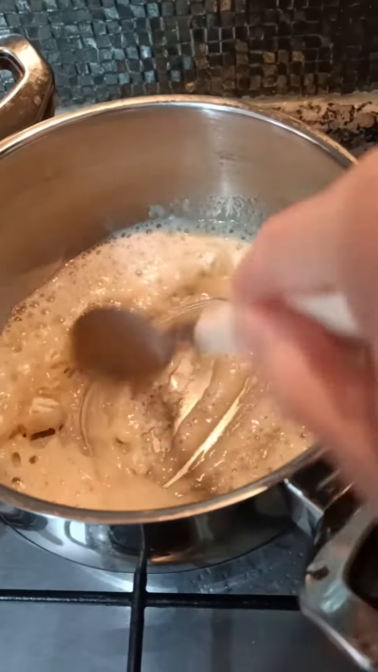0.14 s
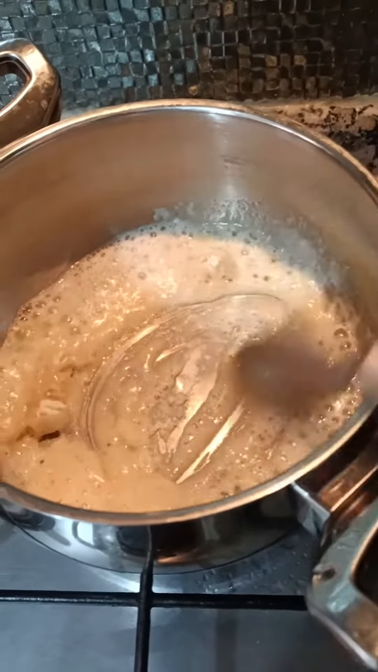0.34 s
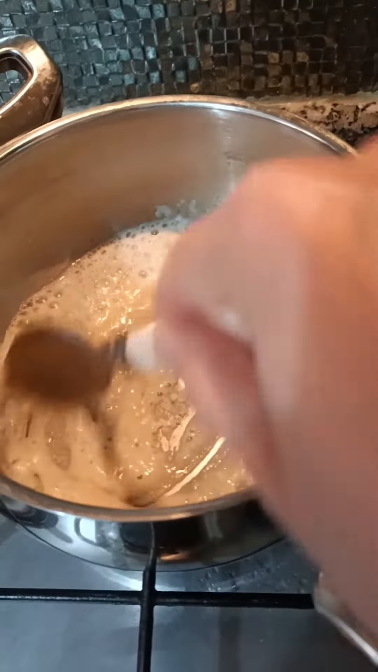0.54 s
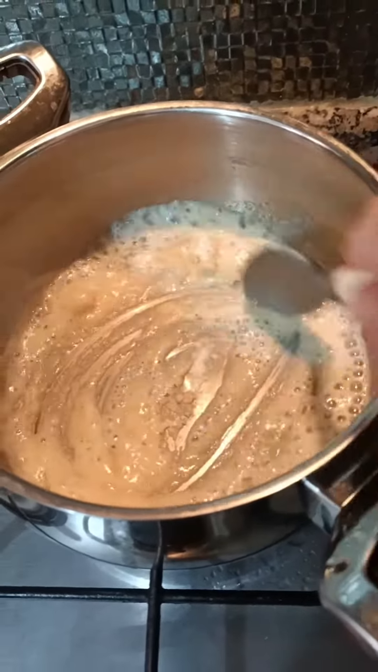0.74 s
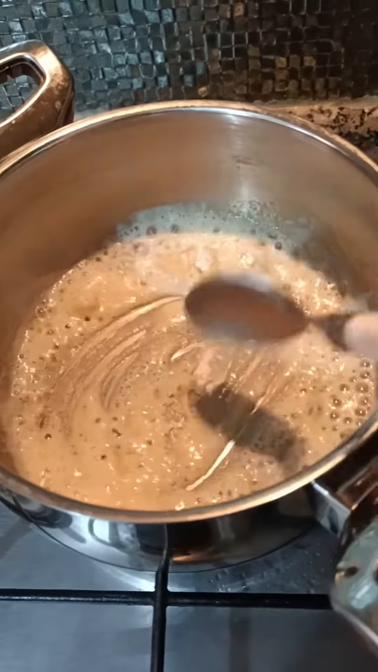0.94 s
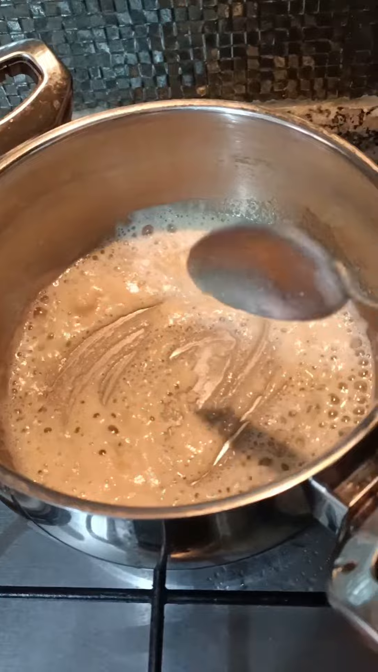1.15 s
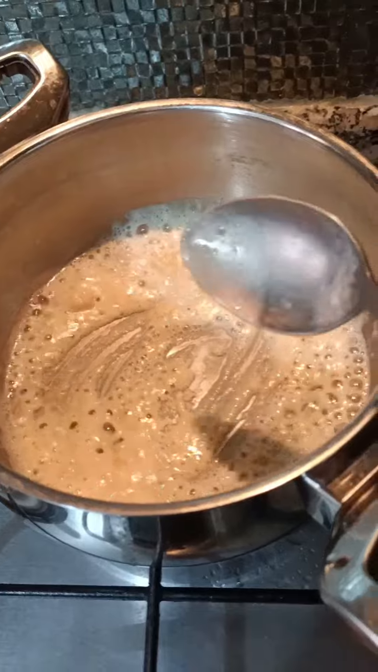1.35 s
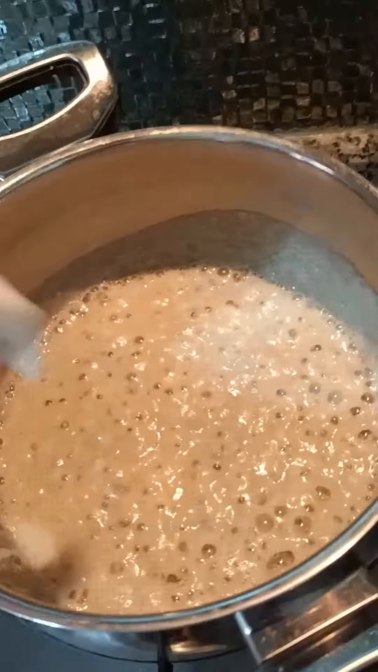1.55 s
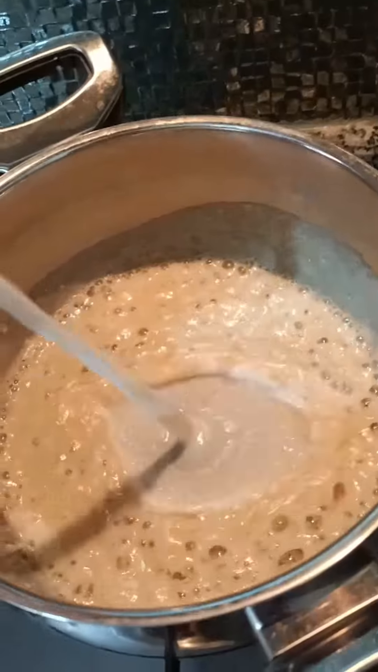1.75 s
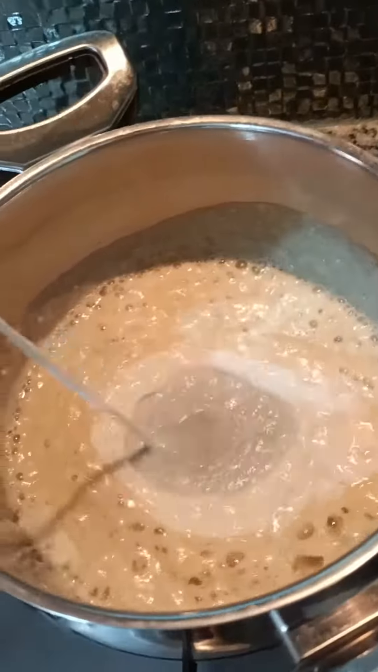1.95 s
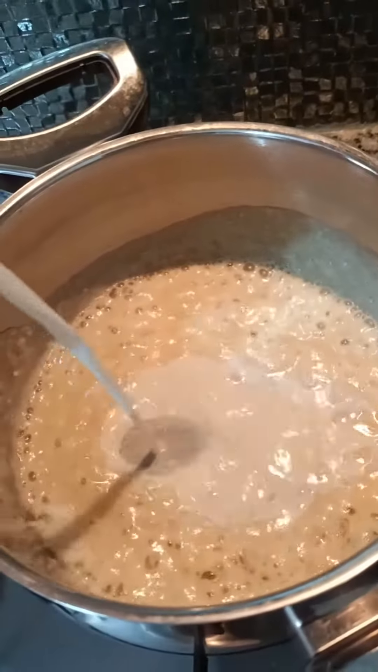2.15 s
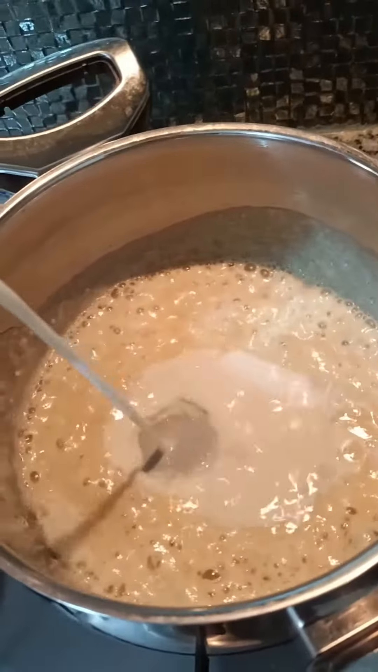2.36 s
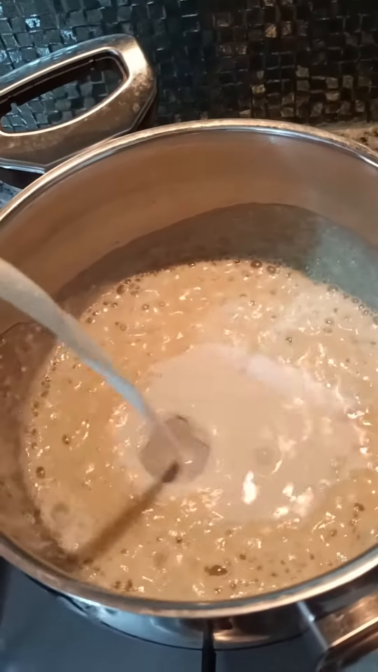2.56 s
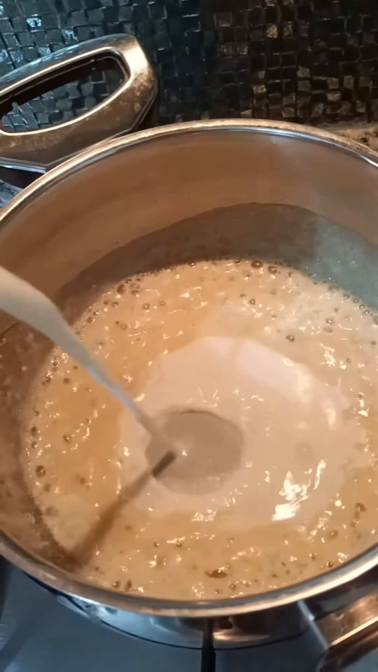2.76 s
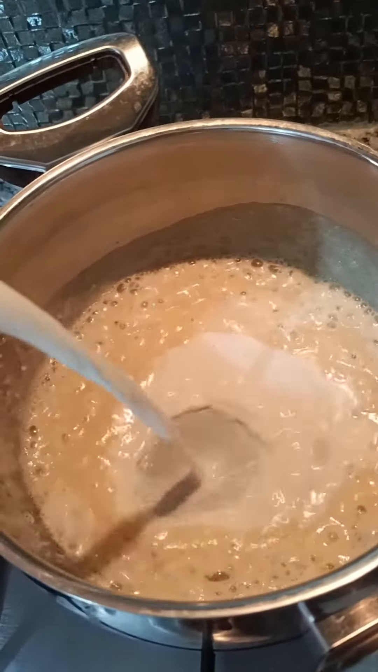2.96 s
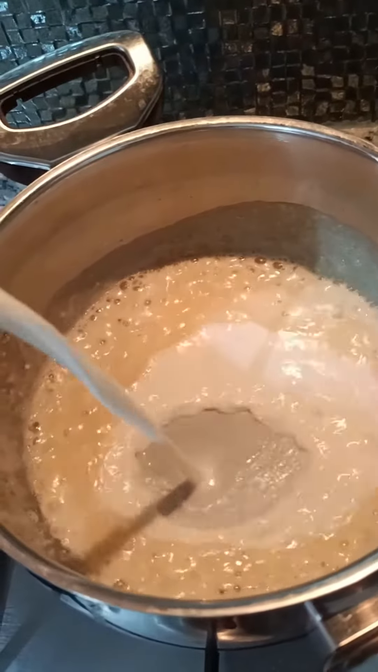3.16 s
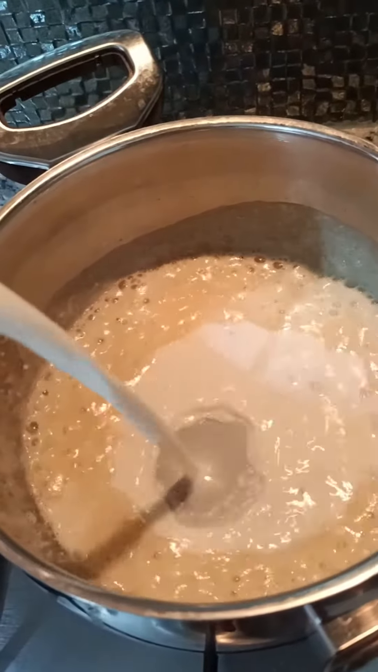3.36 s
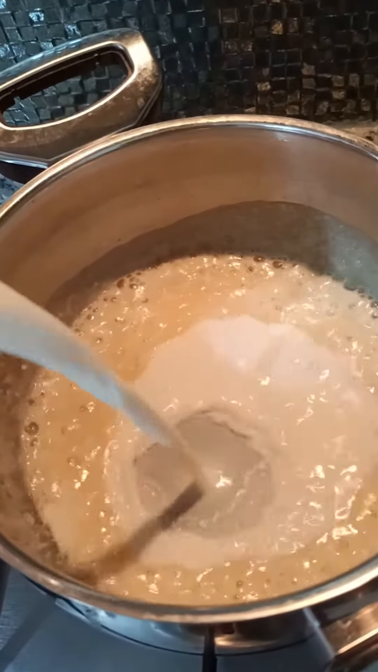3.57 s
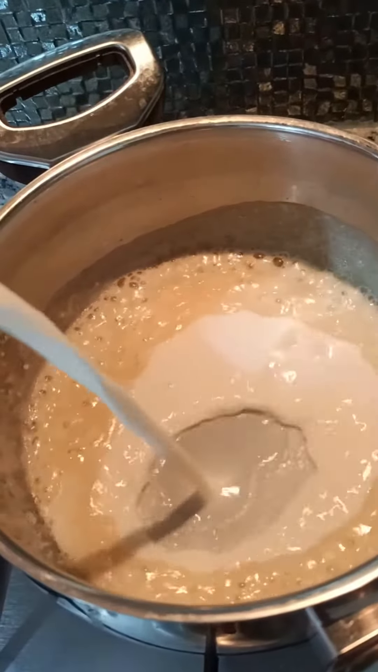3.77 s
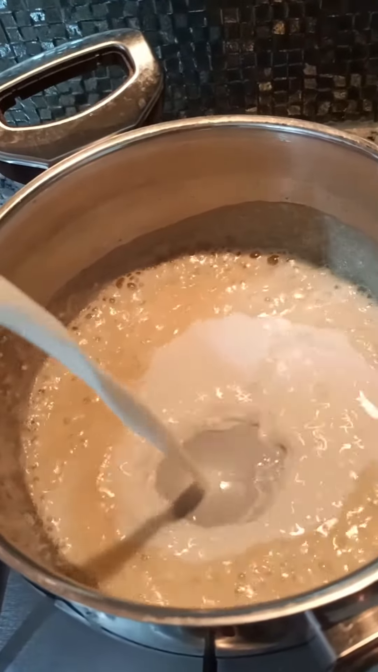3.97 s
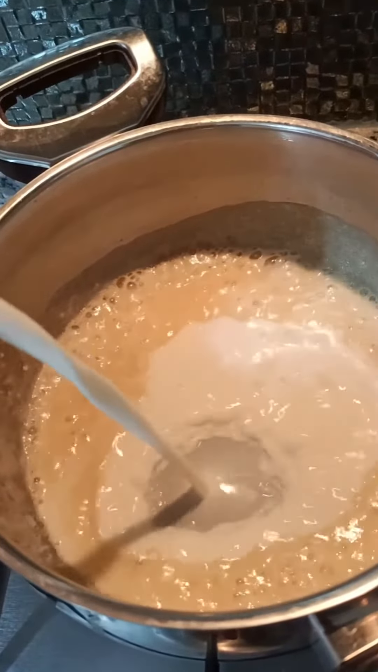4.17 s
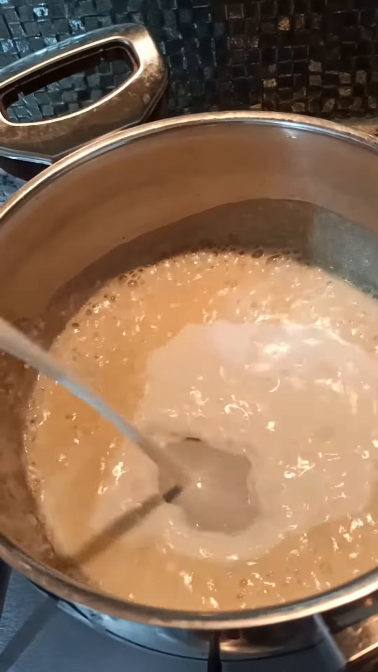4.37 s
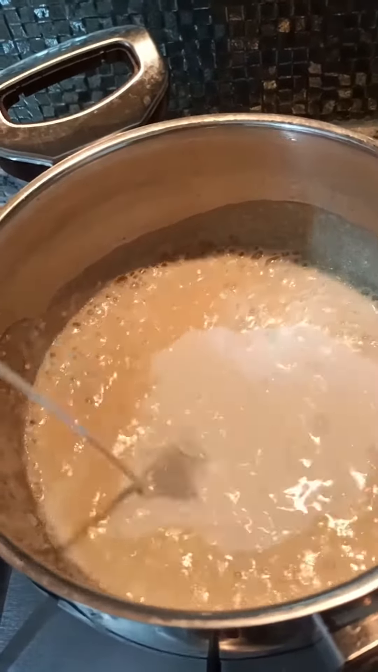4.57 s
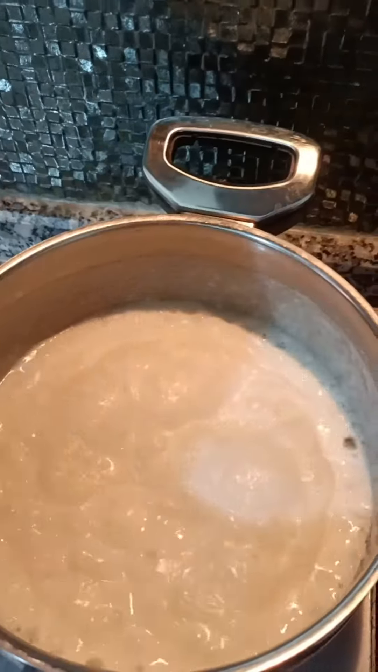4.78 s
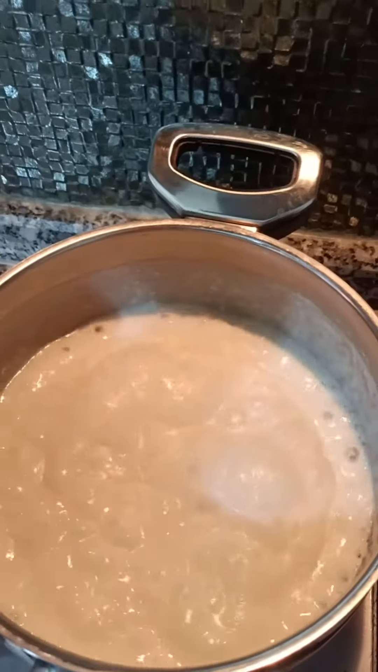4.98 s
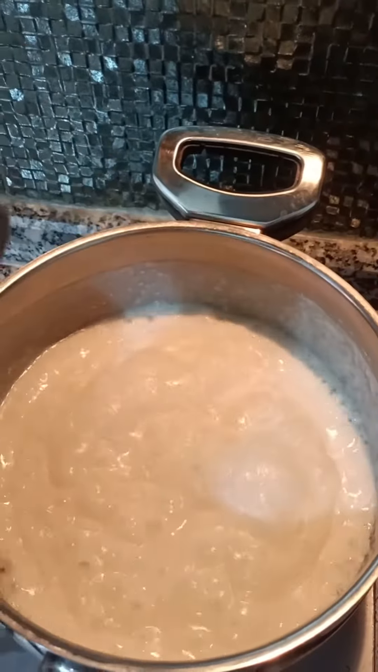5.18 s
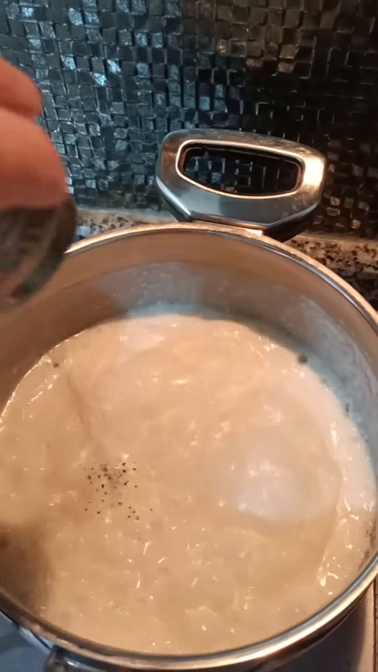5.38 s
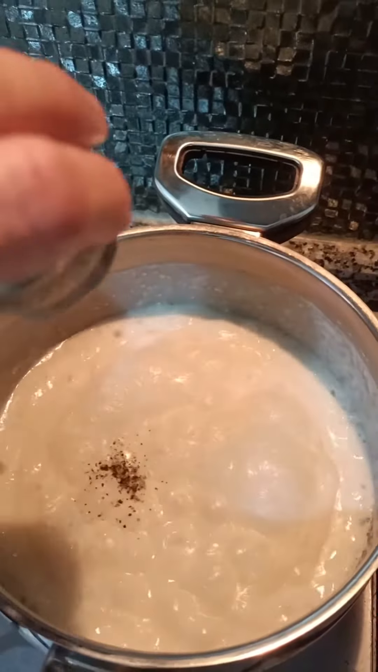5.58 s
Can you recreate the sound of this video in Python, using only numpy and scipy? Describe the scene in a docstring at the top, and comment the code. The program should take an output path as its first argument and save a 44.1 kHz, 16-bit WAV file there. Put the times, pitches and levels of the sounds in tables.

```python
"""Three shots of a steel pot on a gas hob, close to a phone, with the hob rumbling throughout.
First a spoon scrapes and strikes the pot, ringing its steel modes, while flour fries in dense tiny bursts.
Then cold milk is poured in: noise flashes up as hissing steam over a gurgle in the pot's air.
Last, spice is shaken in short dry rustles over the simmering sauce.
Each shot is cut off short and the next fades in; the pot rocks on its grate now and then."""
import sys
import numpy as np
from scipy import signal
from scipy.fft import rfft, irfft, next_fast_len
from scipy.io import wavfile
from scipy.ndimage import uniform_filter1d, map_coordinates

SR = 44100
rng = np.random.default_rng(int(sys.argv[2]) if len(sys.argv) > 2 else 0)


def wav_record(signal):
    """Record a signal, one row per channel, as 16-bit PCM in the file named by sys.argv[1]."""
    frames = np.transpose(np.atleast_2d(signal))
    bounded = np.clip(frames, -1, 1)
    # unit amplitude maps onto the largest positive 16-bit level
    quanta = np.round(bounded * 32767).astype(np.int16)
    wavfile.write(sys.argv[1], SR, quanta)


N = 248724

# milk on hot steel, a flash at first contact and again as it spreads: t/s, hiss/dB, gurgle/dB
POURING = [(1.589, -40, -53.5), (1.78, -38, -50), (1.83, -25.5, -49.5), (1.98, -30.5, -50),
           (2.21, -27, -43), (2.4, -30, -48), (2.55, -31.5, -45.5), (2.75, -31.5, -45), (2.9, -31, -46.5),
           (3.05, -31.5, -47.5), (3.3, -33.5, -46.5), (3.67, -34, -47.5), (3.8, -34.5, -46.5),
           (3.87, -34, -46.5), (4.2, -32.5, -46), (4.66, -33, -45)]
# strokes of the spoon: t/s, scrape/dB, low body/dB, upper modes/dB, ring of the modes over the grit/dB
SCRAPE = [(0, -51, 5, -8, 0), (.036, -30.5, 0, -1.5, 1), (.065, -30.5, -4, -1, 1.5),
          (.1, -34.5, -6, -3, 5.5), (.152, -37.5, -7, 5, -3), (.175, -56, -6, 0, -3),
          (.21, -39, 0, -1.5, -0.5), (.24, -35, -5, -1, 5), (.292, -28, -14, -3.5, 2.5),
          (.33, -32, -6, 0.5, 0), (.35, -30, -3, 4.5, 4), (.372, -33, 1, 11.5, -0.5),
          (.408, -44.5, -5, -2.5, 6), (.4145, -40, -3, -3, 0), (.418, -24, 7, 7.5, -7),
          (.435, -26.5, -4, -1.5, 7), (.46, -25.5, -7, -0.5, 1.5), (.504, -31, -3, 0, 0),
          (.548, -32.5, -16, 3, -8.5), (.582, -40.5, 8, 2, -1), (.606, -37.5, -1, 2, -3),
          (.62, -46, 7.5, -2, 2), (.64, -37, 9, 0, 6), (.664, -29.5, 4.5, -3, 3),
          (.734, -30.5, -6, -1, 0.5), (.84, -35, 2, -0.5, 4), (.876, -50, 8, 8, 2), (.902, -44, 8, -1, -1),
          (.922, -26.5, -3, -4.5, -2), (.95, -40.5, 3, -4, 2), (.975, -49, 4, -2, 8)]
# left port over right port, for steam, for sauce and spice, and for the spoon: f/Hz, left-right/dB
STEAM_SIDE = [(60, 2), (99, 2), (160, 1), (270, 0), (450, -8.5), (740, -5), (1220, 4.5), (2010, -3),
              (3330, -1), (5500, -1.5), (9080, -4.5), (15000, 5)]
SAUCE_SIDE = [(60, -7), (110, -0.5), (200, -4), (380, -7), (700, -2.5), (1290, 5.5), (2380, 1), (4400, 7),
              (8120, -1.5), (15000, 13.5)]
SPOON_SIDE = [(60, -3.5), (99, -0.5), (160, 1), (270, 28), (450, -3), (740, -10), (1220, 4), (2010, 2.5),
              (3330, -2), (5500, 4.5), (9080, -7.5), (15000, 4)]


def amp(db):
    """dB to gain."""
    return 10 ** (np.asarray(db) / 20)


def unit(x):
    """Scaled to rms 1."""
    return x / np.sqrt(np.mean(x ** 2) + 1e-20)


def along(points, hz):
    """(Hz, value) points read on a log frequency axis."""
    f, v = np.transpose(points)
    return np.interp(np.log(hz + 1), np.log(f + 1), v)


def gains(rows):
    """One gain per sample for each dB column, silent outside the rows."""
    s, *columns = np.transpose(rows)
    t = np.arange(N) / SR
    return [amp(np.interp(t, s, db, left=-200, right=-200)) for db in columns]


def swell(start, end, start_db, end_db, rise, fall):
    """Level in dB: a steady rise, a sloping hold, a steady fall (rise and fall in dB per s)."""
    t = np.arange(N) / SR
    hold = np.interp(t, [start, end], [start_db, end_db])
    return hold - rise * np.clip(start - t, 0, None) - fall * np.clip(t - end, 0, None)


def wobble(rate):
    """A smooth random curve, rate knots a second."""
    return map_coordinates(rng.standard_normal(int(N * rate / SR) + 4), [np.arange(N) * rate / SR])


def filtered(x, response):
    """x times a complex response of frequency."""
    m = next_fast_len(N + SR // 4)
    return irfft(rfft(x, m) * response(np.fft.rfftfreq(m, 1 / SR)), m)[..., :N]


def modes(table):
    """Causal response of a set of resonances (Hz, width Hz, dB), alternating in sign."""
    return lambda f: sum((-1) ** k * amp(db) * 1j * f * w / (c * c - f * f + 1j * f * w)
                         for k, (c, w, db) in enumerate(table))


def colour(spectrum):
    """Response that follows a spectrum table."""
    return lambda hz: amp(along(spectrum, hz))


def grains(spiky_db, patchy_db):
    """Two streams of tiny bursts: noise with patches in time and pitch, its strength wavering every ms."""
    z = signal.stft(rng.standard_normal((2, N)), nperseg=512)[2]
    field = uniform_filter1d(rng.standard_normal(z.shape[1:]), 8, 0)
    field = uniform_filter1d(field, 10, 1)
    pair = signal.istft(z * amp(patchy_db * unit(field)), nperseg=512)[1][:, :N]
    return pair * amp(spiky_db * wobble(900))


def ports(pair, response, side):
    """Two streams heard at the two microphone ports: alike in the bass, less so in the treble; mid rms 1."""
    # f/Hz, likeness of the ports (0 to 1)
    alike = [(60, .997), (110, .985), (170, .92), (350, .8), (690, .86), (1000, .65), (2000, .55),
             (5000, .35), (12000, .2)]
    # f/Hz, lag of the left port/rad
    lag_points = [(150, 0), (500, .3), (900, .8), (1300, 2.4), (2400, 1.8), (7000, 3)]
    turn = lambda hz: np.arccos(np.clip(along(alike, hz), 0, 1)) / 2
    a, b = filtered(pair, lambda hz: response(hz) * [np.cos(turn(hz)), np.sin(turn(hz))])

    def lean(hz):
        # echoes off the pot wall swing the phase between the ports back and forth along the treble
        echo = 3.48 * np.clip(hz / 900 - 1, 0, 1) * np.sin(2 * np.pi * hz * .0016)
        return amp(along(side, hz) / 2 * (hz > 250)) * np.exp(-.5j * (along(lag_points, hz) + echo))

    both = filtered(np.array([a + b, a - b]), lambda hz: np.array([lean(hz), 1 / lean(hz)]))
    return both / np.std(both.mean(0))


def pips(s, db, hz, cycles):
    """Short damped sines, one for each row, dying 60 dB in three times their cycles."""
    u = np.arange(3 * SR * cycles // int(np.min(hz)))[None] / SR * hz[:, None]  # cycles elapsed
    wave = amp(db)[:, None] * np.sin(2 * np.pi * u) * amp(-20 * u / cycles)
    at = np.round(s * SR).astype(int)[:, None] + np.arange(u.shape[1])
    return np.bincount(at.ravel(), wave.ravel(), N + SR)[:N]


def hob():
    """The gas flame and the kitchen rumble as low noise and keep the grate humming at a narrow resonance."""
    # each shot's own background: t/s, rumble/dB, hum of the grate/dB
    levels = [(0, -52.5, -53), (1.55, -52.5, -54), (1.6, -48, -59), (3.2, -47.5, -55.5), (4.66, -46.5, -55),
              (4.7, -52, -42), (5.04, -47, -59), (5.14, -45, -50), (5.33, -51, -52.5), (5.64, -48.5, -53.5)]
    # f/Hz, level/dB
    rumble_spectrum = [(12, -48), (20, -41), (43, -2.5), (70, -9.5), (85, -10), (102, 2), (135, -8),
                       (166, -3.5), (220, -11), (307, -3), (369, -9), (401, -4), (436, -15.5), (560, -15.5),
                       (730, -19.5), (1230, -120)]
    flame = ports(grains(spiky_db=-1.5, patchy_db=2.0), colour(rumble_spectrum), [(100, 0.34), (380, 3.9)])
    bars = unit(filtered(rng.standard_normal(N), lambda f: modes([(101, 16, 0)])(f) ** 2))
    rumble, hum = gains(levels)
    return rumble * amp(0.27 * wobble(6.8)) * flame + hum * amp(2 * wobble(2.84)) * bars


def hand():
    """The phone shifts in the hand: a deep swell of low noise with a slow sway, then a faint rest of it."""
    # one shift: from t/s, to t/s, start level/dB, end level/dB, rise/(dB/s), fall/(dB/s)
    shift = (5.17, 5.29, -43, -44, 300, 150)
    t = np.arange(N) / SR
    skin = [(8, -15), (17, 11), (35, -6), (57, 8.0), (90, -20), (200, -5.5), (500, -47)]  # f/Hz, level/dB
    noise = unit(filtered(rng.standard_normal(N), colour(skin)))
    sway = amp(-7) * np.sin(2 * np.pi * 14 * t)  # 14 Hz
    grip = amp(swell(*shift)) + amp(-67) * (t > shift[0])
    return grip * (noise + sway)


def grate():
    """The pot rocks on its grate: each knock sets low sines droning and its foot lands with a dull thud."""
    # t/s, level/dB, rise/s, t60/s, thud over the level/dB
    knocks = [(0.425, -13.5, 0.03, 0.33, -12), (.585, -26, 0.0024, 0.087, -9),
              (1.909, -39, 0.004, 0.068, 10.5), (2.304, -39, 0.0018, 0.2, 13.5),
              (3.2, -32, 0.0021, 0.16, 5), (5.118, -29, 0.012, 0.12, -17)]
    # drone of the grate: f/Hz, level/dB
    bars = [(48.4, -6.5), (96.9, 4.5), (339, -20.5)]
    # the pot's foot lands: f/Hz, level/dB, t60/s
    foot = [(62, -2, 0.04), (137, -7, 0.026), (314, -2, 0.05)]
    t, out = np.arange(N) / SR, np.zeros(N)
    for s, db, rise, t60, thud_db in knocks:
        u = np.clip(t - s, 0, None)
        drone = sum(amp(level) * np.sin(2 * np.pi * hz * u) for hz, level in bars)
        thud = sum(amp(level - 60 * u / dies) * np.sin(2 * np.pi * hz * u) for hz, level, dies in foot)
        thud = thud * (1 - np.exp(-u / 0.004))
        envelope = (1 - np.exp(-u / rise)) ** 2 * amp(-60 * u / t60)
        out += amp(db) * (envelope * drone + amp(thud_db) * thud)
    return out


def frying():
    """Flour in fat: dense bursting bubbles, as spiky coloured noise."""
    # t/s, level/dB
    level = [(0.0, -44), (1.55, -51.5)]
    # f/Hz, level per Hz/dB
    spectrum = [(260, -40), (450, -16.5), (562, -8.5), (642, -8.5), (1000, -9), (1090, -8), (1660, -5),
                (1980, -0.5), (2950, -6), (3800, -5.5), (4470, -4), (6190, -4), (15500, -10)]
    # f/Hz, left-right/dB
    side = [(60, -8), (110, -6.5), (200, 0.0), (380, -26), (700, -5.5), (1290, 5.5), (2380, 0),
            (4400, -1.0), (8120, -5.5), (15000, 2)]
    return gains(level)[0] * ports(grains(spiky_db=1.5, patchy_db=0.5), colour(spectrum), side)


def simmer():
    """Sauce bubbles burst densely, coloured by the resonances of the full pot."""
    # t/s, level/dB
    level = [(4.7, -48.5), (4.8, -49), (4.95, -48), (5.2, -48), (5.46, -48.5), (5.5, -45.5), (5.54, -49),
             (5.64, -47)]
    # f/Hz, level/dB
    spectrum = [(260, -29), (450, -5.5), (712, -3), (1110, -8.5), (1610, -9), (1840, -10), (3690, -11),
                (4470, -12), (4880, -14.5), (5750, -12.5), (6570, -14), (9940, -16.5), (13200, -18),
                (14600, -24), (15500, -51.5)]
    # the full pot's colour: f/Hz, width/Hz, level/dB
    bands = [(1926, 50, 6.5), (2830, 220, -2.5), (4500, 100, 4.5), (5600, 210, -5), (11000, 250, -11)]
    full = lambda f: colour(spectrum)(f) * (1 + np.abs(modes(bands)(f)))
    bubbles = ports(grains(spiky_db=3, patchy_db=1), full, SAUCE_SIDE)
    return gains(level)[0] * amp(1.0 * wobble(70)) * bubbles


def shaker():
    """Spice grains rattle in the jar: a quick rise and a short dry rustle, with single grains ticking."""
    # t/s, peak/dB, low part over the high/dB
    shakes = [(4.8686, -48, 4), (4.925, -51, 0), (5.0936, -60, -3), (5.171, -53, 0), (5.2069, -48.5, 4),
              (5.2568, -48, -12), (5.2962, -46, -7), (5.384, -50, 6), (5.4419, -46, -12), (5.4785, -52, 3),
              (5.51, -49, -1), (5.573, -42, 2)]
    # single grains on glass or steel: t/s, peak/dB, f/Hz
    ticks = [(5.172, -39.5, 5500), (5.188, -38.5, 5500), (5.208, -38, 5500), (5.215, -42, 13000),
             (5.258, -38, 12500), (5.277, -43, 13500), (5.285, -38.5, 5000), (5.298, -38, 12500),
             (5.352, -45, 13000), (5.402, -39.5, 5000), (5.503, -42, 5800), (5.572, -36, 6000)]
    rise_s, t60_s = .015, .035  # each for 60 dB
    t = np.arange(N) / SR
    high_spectrum = [(4000, -23), (6000, -4), (9500, -6), (13000, -4), (15500, -17)]  # f/Hz, level/dB
    low_spectrum = [(800, -20), (1800, -10), (4500, -6), (7000, -15), (9000, -30)]  # f/Hz, level/dB
    high = ports(grains(spiky_db=2.5, patchy_db=-3.0), colour(high_spectrum), SAUCE_SIDE)
    low = ports(grains(spiky_db=2.5, patchy_db=1.5), colour(low_spectrum), SAUCE_SIDE)
    out = pips(*np.transpose(ticks), cycles=5)
    for s, db, low_db in shakes:
        envelope = amp(db - 60 * np.abs(t - s) / np.where(t > s, t60_s, rise_s))
        out = out + envelope * (high + amp(low_db) * low)
    return out


def gurgling():
    """The poured milk gurgles in the air of the pot, and now and then the stream traps a plopping pocket."""
    # air in the pot: f/Hz, width/Hz, level/dB
    air_modes = [(617, 24, -1.5), (658, 20, -0.5), (697, 24, -1), (997, 20, -10.5), (1310, 63, -3.5),
                 (1393, 110, -3.5)]
    # trapped pockets of air: t/s, peak/dB, f/Hz
    plops = [(2.227, -29.5, 665), (2.839, -30.5, 692), (2.982, -33, 660), (3.035, -32.5, 703)]

    def air(f):
        resonances = sum(np.abs(modes([mode])(f)) for mode in air_modes)
        return resonances + amp(-16) * (f > 400) * (f < 2500)

    level = gains(POURING)[1] * amp(0.5 * wobble(30) + 0.4 * wobble(25))
    pour = level * ports(grains(spiky_db=1.5, patchy_db=0.4), air, STEAM_SIDE)
    return pour + pips(*np.transpose(plops), cycles=9)


def steam():
    """Milk flashes to steam: dense bursts hiss, thin at first, the lower part filling in as the milk pools."""
    # f/Hz, level/dB
    spectrum = [(880, -21), (1500, -43.5), (1920, -8.5), (2070, -9), (2600, -3.5), (3250, -0.5), (3800, -4),
                (4390, 0.5), (4800, -1), (6130, 0.5), (6750, -2), (8710, 0), (9790, -4), (13400, 0),
                (14800, -1.5), (15500, -16.5)]
    thin_db, thin_until_s, fill_s, thin_hz = -5, 1.98, 0.27, 4500
    level = gains(POURING)[0] * amp(0.64 * wobble(12) + 0.75 * wobble(60))
    hiss = level * ports(grains(spiky_db=1.76, patchy_db=1.35), colour(spectrum), STEAM_SIDE)
    thin = amp(np.interp(np.arange(N) / SR, [thin_until_s, thin_until_s + fill_s], [thin_db, 0]))
    lower = filtered(hiss, lambda hz: 1 / (1 + (hz / thin_hz) ** 6))
    return hiss + (thin - 1) * lower


def spoon_drone():
    """The pot's air drones at one resonance where the spoon turns at the wall, and faintly under the scrape."""
    # from t/s, to t/s, level/dB
    turns = [(0, 0.018, -44.5), (0.385, 0.402, -47), (.42, .428, -46), (0.441, 0.449, -38.5),
             (0.829, 0.904, -47)]
    level = amp(-29) * gains(SCRAPE)[0]
    for start, end, db in turns:
        level = level + amp(swell(start, end, db, db, rise=900, fall=920))
    resonance = lambda f: modes([(630, 110, 0)])(f) ** 2
    return level * ports(grains(spiky_db=2.5, patchy_db=-2.0), resonance, SPOON_SIDE)


def spoon_blows():
    """Each blow on the wall is a short bright crack of noise; the spoon's tip clinks as damped sines."""
    # t/s, level/dB, contact/s, t60 of the crack/s
    blows = [(.2914, -33, .001, 0.012), (0.4152, -16.5, .008, .03), (.4525, -25, .0008, .008),
             (.919, -35, .004, .03)]
    # the tip: t/s, peak/dB, f/Hz
    clinks = [(.2916, -24, 3000), (.4165, -22.5, 1400), (.4225, -28, 1870)]
    t = np.arange(N) / SR
    crack = sum(amp(db - 60 * np.clip(t - s - hold, 0, None) / t60) * np.clip((t - s) / .0007, 0, 1)
                for s, db, hold, t60 in blows)  # each rises in 0.7 ms
    spectrum = [(300, -13), (700, -8), (1500, -9), (3000, 5.0), (4500, 1), (5500, 3), (6800, -11),
                (8500, 7), (11000, 5.5), (15000, -1.5)]  # f/Hz, level/dB
    burst = ports(grains(spiky_db=-0.5, patchy_db=3.0), colour(spectrum), SPOON_SIDE)
    return crack * burst + pips(*np.transpose(clinks), cycles=6)


def spoon_scrape():
    """The edge catches on the steel in fine grit, and each catch drives the ringing modes of pot and spoon."""
    # pot and spoon: f/Hz, width/Hz, level/dB
    steel = [(1107, 34, -19.5), (1402, 37, -5.5), (1857, 31, -7), (2230, 37, -15), (2655, 99, -8),
             (3180, 24, -4.5), (3840, 26, -6), (3906, 50, -6), (3952, 29, -1), (4410, 43, -3),
             (4600, 46, -10.5), (5470, 65, -4), (5600, 47, -4), (5690, 75, -1.5), (5730, 37, -12),
             (5940, 40, -6), (6060, 33, -17), (7650, 38, -2.5), (8000, 35, -8), (8300, 45, -7),
             (8620, 73, -6), (8720, 40, -7), (8835, 20, -7), (9300, 37, -23), (9457, 45, -14),
             (10430, 65, -12), (12800, 290, -23)]
    # scrape between the modes: f/Hz, level per Hz/dB
    grit_spectrum = [(530, -61), (900, -14.5), (3850, -3.5), (5060, -8), (5700, -1), (6580, -8),
                     (8550, -1.5), (9700, -12.5), (11000, -17), (12400, -13), (13600, -5), (15500, -59)]
    # groups of modes that sing together: from f/Hz, to f/Hz
    families = [(1050, 1500), (3650, 4100), (5350, 6050), (7600, 8900)]
    # the travelling contact point wakes now one group, now another: t/s, then one level/dB for each group
    singing = [(0, -63, -56, -58, -59), (.034, -62, -40, -32, -29), (.06, -65, -42, -32, -32),
               (.1, -64, -40, -41, -42), (.125, -62, -42.5, -37, -41), (.154, -62, -43, -39, -42),
               (.17, -65, -58, -54, -56), (.2, -60, -48, -50, -50), (.238, -46, -44, -35, -49),
               (.258, -52, -42, -44, -37), (.302, -43, -39, -36, -38), (.328, -46, -39, -37, -43),
               (.346, -51, -31, -36, -29), (.374, -49, -38, -33, -30), (.398, -65, -49, -42, -45),
               (.4145, -60, -46, -54, -56), (.418, -39, -33, -36, -22), (.435, -47, -37, -28, -33),
               (.456, -50, -38, -29, -28), (.504, -49, -44, -38, -39), (.55, -54, -38, -36, -38),
               (.58, -47, -50, -40, -47), (.606, -59, -57, -49, -35.5), (.62, -59, -60, -52, -54),
               (.664, -41, -49, -47, -41), (.708, -41, -43, -37, -43), (.74, -49, -40, -39, -42),
               (.79, -50, -40, -38, -41), (.842, -50, -37, -38, -43), (.878, -66, -62, -58, -51),
               (.898, -62, -55, -59, -52), (.922, -56, -32, -24.5, -33), (.95, -64, -46, -48, -50),
               (.99, -75, -57, -62, -60)]
    # one trim/dB for each group
    trims = [-5, -6, -6.5, -4]
    scrape, body, bright, ringing = gains(SCRAPE)
    catch = ports(grains(spiky_db=1.5, patchy_db=2.5), np.ones_like, SPOON_SIDE)

    def rung(force, table):
        # as the contact point travels, each mode waxes and wanes on its own, and rings on after the edge lifts
        return sum(filtered(force * amp(4.5 * wobble(45)) * catch, modes([mode])) for mode in table)

    groups = [[mode for mode in steel if lo < mode[0] < hi] for lo, hi in families]
    loners = [mode for mode in steel if not any(mode in group for group in groups)]
    ring = rung(scrape * ringing, loners)
    song = 0
    for force, trim_db, group in zip(gains(singing), trims, groups):
        loudness = np.std(filtered(catch.mean(0), modes(group)))
        song = song + rung(force * amp(trim_db), group) / loudness
    grit = scrape * ports(grains(spiky_db=2.0, patchy_db=2.5), colour(grit_spectrum), SPOON_SIDE)
    rub = amp(12.0) * ring + amp(-2.5) * grit
    low = filtered(rub, lambda hz: 1 / (1 + (hz / 1770) ** 6))  # the scrape's low body
    high = filtered(rub, lambda hz: 1 / (1 + (7000 / (hz + 1)) ** 6))  # a steeper edge favours the upper modes
    return song + rub + (body - 1) * low + (bright - 1) * high


def scene():
    """Everything around the pot, from the background to the spoon."""
    background = hob() + hand() + grate()
    cooking = frying() + simmer() + shaker() + gurgling() + steam()
    return background + cooking + spoon_drone() + spoon_blows() + spoon_scrape()


def record(dry):
    """The edit: each shot fades in and is cut with a fast-dying end; nothing is kept above the band limit."""
    # start t/s, end t/s, fade-in/s, level the fade starts from/dB
    shots = [(0, 1.548, .001, 0), (1.59, 4.662, 0.27, -15.5), (4.701, 5.7, 0.31, -19)]
    top_hz = 15580
    t = np.arange(N) / SR
    fade = sum(np.clip(amp(db) + (t - a) / rise, 0, 1) * (t >= a) * (t < b) for a, b, rise, db in shots)
    end = sum((t >= b) * amp(-21.5 - 60 * np.abs(t - b) / 0.038) for a, b, rise, db in shots)
    # the dying end repeats the sound of 50 ms before
    held = dry * fade + end * np.roll(dry, SR // 20, axis=1)
    return filtered(held, lambda hz: np.clip((top_hz - hz) / 120, 0, 1) ** 2)


dry = scene()
out = record(dry)
wav_record(out)
```